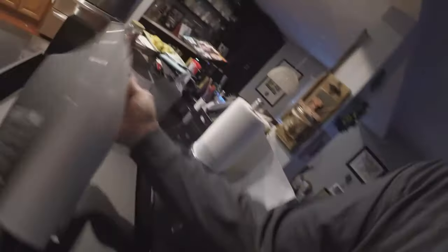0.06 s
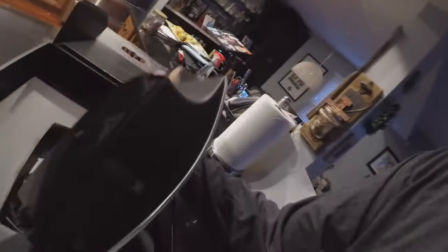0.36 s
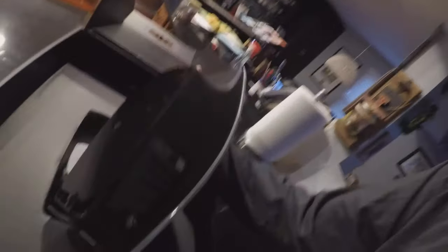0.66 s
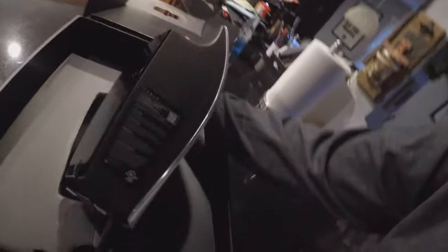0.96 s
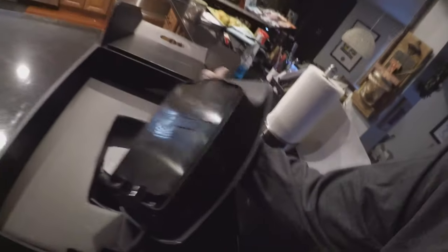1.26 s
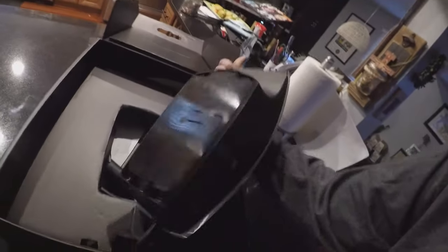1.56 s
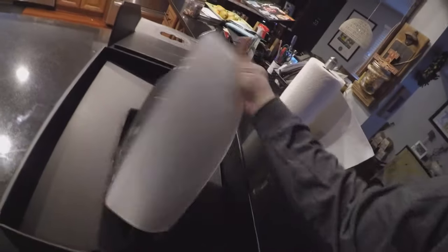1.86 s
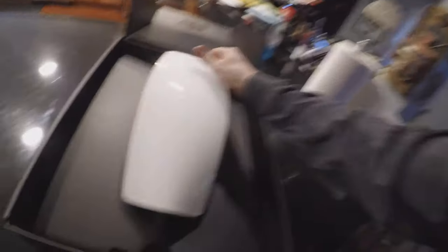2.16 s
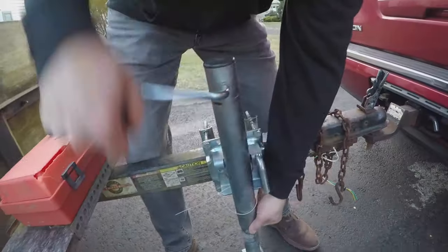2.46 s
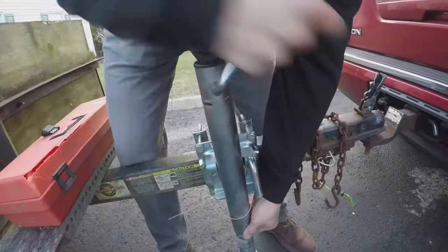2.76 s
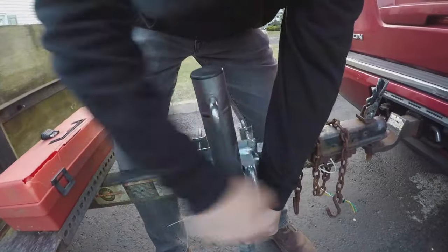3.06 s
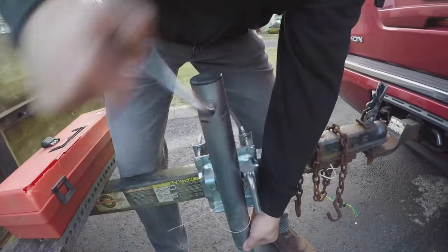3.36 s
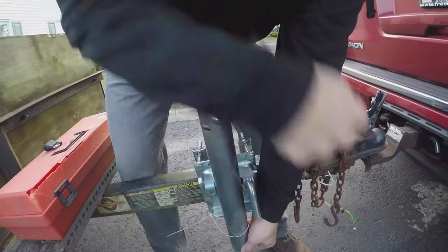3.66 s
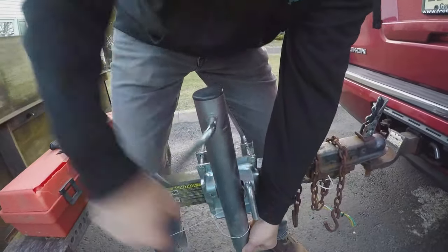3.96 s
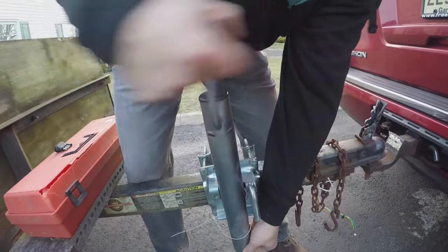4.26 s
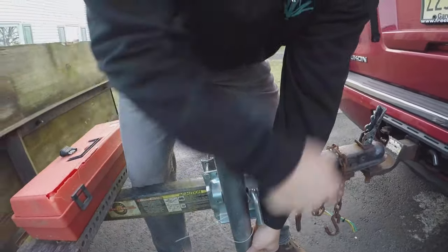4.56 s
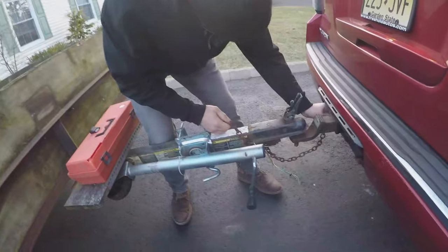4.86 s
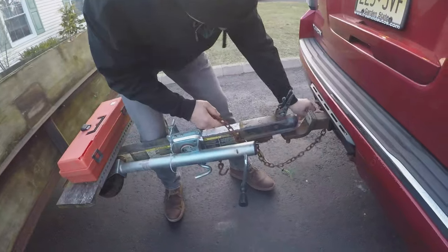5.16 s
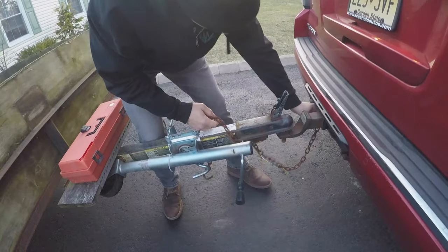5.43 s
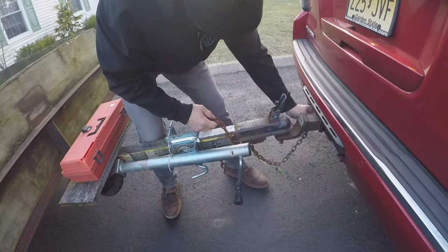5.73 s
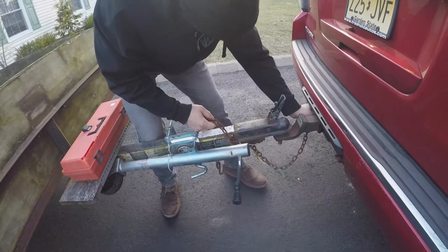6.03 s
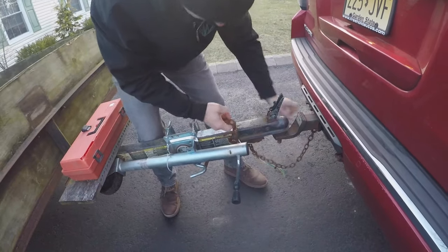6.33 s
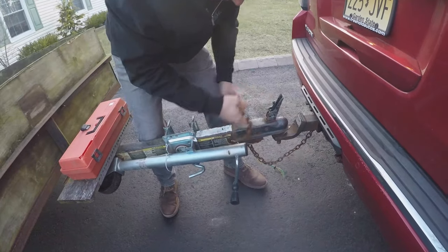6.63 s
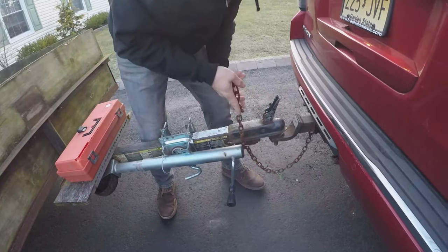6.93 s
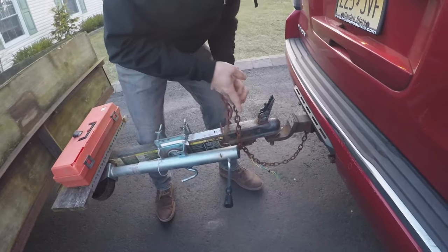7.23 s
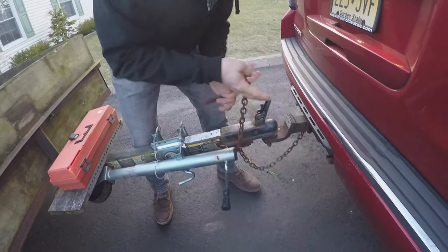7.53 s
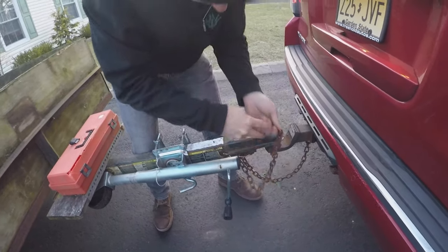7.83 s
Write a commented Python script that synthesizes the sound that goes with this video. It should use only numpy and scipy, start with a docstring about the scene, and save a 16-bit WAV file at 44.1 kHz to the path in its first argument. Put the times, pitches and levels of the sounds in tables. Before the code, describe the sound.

Close, hollow plastic bumps and slides against a tray in a still room. Suddenly the setting is a driveway with a low idling engine, and a hand-cranked trailer jack gives uneven metal clanks over ticking gears and a groaning screw. That switches to the sharp rattle of a hitch coupler, followed by the clacks of a hook and small, bell-like clinks of chain links.

```python
"""Plastic shell, trailer jack and hitch

In a quiet kitchen a hollow plastic shell knocks and scrapes in its packing tray. Then, outdoors by an
idling van, a trailer jack is cranked: its gears tick, its screw grinds, its loose tubes clank. Last the
coupler rattles on the hitch ball, the safety chain's hook clacks and one link rings. Impacts excite
damped modes of vibration; stick-slip friction makes the scrapes and squeaks."""
import sys
import numpy as np
from scipy import signal
from scipy.fft import rfft, irfft
from scipy.io import wavfile

SR = 44100
rng = np.random.default_rng(int(sys.argv[2]) if len(sys.argv) > 2 else 0)


def bounce(signal):
    """Save signal as a 16-bit WAV file at the path given by the first command-line argument."""
    frames = np.transpose(np.atleast_2d(signal))
    limited = np.clip(frames, -1, 1)
    pcm = np.round(limited * 32767).astype(np.int16)
    wavfile.write(sys.argv[1], SR, pcm)


N = 352359
TIME, BINS = np.arange(N) / SR, np.fft.rfftfreq(N, 1 / SR)
OUTDOORS_AT_S, HITCH_AT_S = 2.461, 4.735
PIVOT_HZ, CUTOFF_HZ = 2000, 15600  # centre of a blow's spectral tilt; upper band limit

# Spectra of room air, outdoor wash and slow air pressure: (frequency [Hz], relative density [dB])
KITCHEN_SPECTRUM = [(35, -29), (60, 9), (246, -12), (289, -5), (1210, -12), (3340, -17), (4110, -19.5),
                    (9020, -24), (14000, -32), (15000, -31)]
STREET_SPECTRUM = [(15, -38), (25, 2.5), (88, -11.5), (115, -11), (191, -17.5), (344, -18.5), (415, -22.5),
                   (790, -23.5), (1090, -28), (1670, -27), (4150, -37.5), (4500, -39), (7480, -45),
                   (8100, -46.5), (15000, -59)]
SWAY_SPECTRUM = [(.5, -20), (2, 0), (5, -3), (10, -16), (20, -31), (40, -49), (80, -70), (300, -110)]
KITCHEN_DB, STREET_DB = -49, -35
# Envelopes of the outdoor wash and the slow air pressure: (time [s], level [dB])
STREET_ENVELOPE = [(2.46, 3.5), (4.7, 7), (4.8, 6), (5.6, 6), (6.4, 5), (6.8, 2.5), (7.4, 5.5), (8, 5.5)]
SWAY_ENVELOPE = [(0, -11.5), (.9, -13), (1.3, -16), (1.7, -12), (2.4, -14), (2.6, -18.5), (8, -20)]
# Idling speed: (time [s], second harmonic of the firing rate [Hz])
IDLE_SPEED = [(2.5, 100.3), (3.1, 100.3), (3.2, 99), (4.65, 98.9), (4.8, 97.5), (5.3, 96.6), (5.6, 99),
              (8, 98.9)]
# Exhaust harmonics: (order [multiple of the cycle rate], level [dB])
ENGINE_ORDERS = [(3, -33), (4, -46), (5, -34), (7, -38), (8, -27), (9, -40), (10, -42), (11, -27),
                 (12, -39), (13, -29), (14, -39), (16, -29), (21, -44), (22, -42), (23, -46), (24, -41)]

# Impacts: (time [s], level [dB], brightness [dB/octave], t60 at 3 kHz [s])
SHELL_IMPACTS = [(.177, -30.5, 1.3, 0.037), (.24, -28, 3, 0.17), (.261, -18, 0.8, 0.065),
                 (.426, -36, 3, 0.044), (.497, -42, 5, 0.11), (.993, -34, 3, 0.023),
                 (1.55, -31.5, 3, 0.035), (1.654, -23, -0.8, 0.04), (1.681, -24.5, 1, 0.056),
                 (1.723, -29, -1, .068), (1.734, -23.5, 7.5, 0.049), (1.749, -14.5, -0.5, 0.038),
                 (1.897, -24.5, 0, 0.12), (1.91, -21, 0, 0.025), (1.946, -23.5, 0.4, 0.25),
                 (2.016, -25.5, 0, 0.42), (2.139, -23.5, -0.8, 0.28), (2.172, -27, -2.5, 0.27),
                 (2.211, -22, -4, 0.075), (2.222, -29.5, 6.5, 0.42), (2.254, -22, -2.3, 0.09),
                 (2.277, -22.5, -1.3, 0.067)]
HOOK_IMPACTS = [(6.273, -32, -2.5, 0.098), (6.2905, -25.5, 5.5, 0.17), (6.314, -15, -0.5, .12),
                (6.357, -39.5, 10, 0.14), (6.425, -36.5, -4, 0.068), (6.475, -29.5, -2, 0.26),
                (6.538, -24, 3.4, 0.079), (6.603, -20, 0.9, 0.14), (6.643, -16.5, 0, 0.15),
                (6.672, -24.5, -1.8, 0.13), (6.7, -25, -4, 0.082), (6.921, -34.5, -1.5, .06),
                (6.944, -29.5, -2.8, 0.19), (7.326, -24, -1.5, 0.21), (7.5035, -17.5, 0.5, 0.1),
                (7.591, -49, 9, 0.03), (7.727, -23, 0, 0.11), (7.765, -34.5, 0.5, 0.39),
                (7.815, -32.5, -1.3, 0.093), (7.849, -46.5, 7, .06), (7.93, -35, 8, 0.065),
                (7.942, -20.5, 0, 0.15)]
# Rebounding impacts: (time [s], level [dB], brightness [dB/octave], t60 at 3 kHz [s], rebound [dB])
JACK_IMPACTS = [(2.598, -16, -0.3, 0.071, -3), (2.7455, -11, 0.3, 0.07, -12),
                (3.065, -22, -1.5, 0.15, -2.5), (3.146, -16.5, -0.5, 0.11, -12),
                (3.158, -16.5, -0.5, 0.062, -11), (3.251, -16, -0.5, 0.069, -1),
                (3.4125, -16.5, 0, 0.08, -20), (3.5655, -14.5, -0.6, 0.11, -23),
                (3.635, -15, 0.3, 0.096, -2), (3.712, -23.5, -1.5, .05, -12), (3.743, -22, -2, 0.083, -17),
                (3.941, -24.5, -1.5, 0.056, -27), (4.046, -21, -1, 0.093, -22), (4.112, -14.5, 0, 0.09, -2),
                (4.229, -24.5, -2.5, 0.073, -4), (4.579, -26.5, -4, 0.091, -12),
                (4.591, -14, 0.9, 0.076, -23), (4.62, -19.5, -2, 0.057, -3.5),
                (4.684, -15.5, -0.5, 0.11, -15)]
COUPLER_IMPACTS = [(4.89, -17.5, -0.16, 0.069, -3.5), (4.9775, -14, -0.97, 0.058, -1.5),
                   (5.183, -25, -0.16, 0.22, -5), (5.284, -20, 1.8, 0.24, -2),
                   (5.341, -17.5, -1.7, 0.058, -3.5), (5.391, -22.5, 1.8, 0.13, -0.5),
                   (5.71, -30.5, -1.3, 0.12, -19), (5.788, -29.5, -1.2, .19, -14),
                   (5.818, -27, -2.7, 0.099, -15), (5.953, -30.5, 2.4, 0.18, -7),
                   (5.9755, -12, 1, 0.13, -11), (6.142, -11, 1.3, 0.083, -5)]
# Main modes of each body: (frequency [Hz], relative level [dB], t60 [s])
SHELL_RESONANCES = [(294, -13, 0.15), (384, -27, 0.02), (524, 29.5, 0.015), (915, -46, 0.098),
                    (1760, 26.5, 0.018), (2210, -15, 0.027)]
JACK_RESONANCES = [(259, 1, 0.1), (296, 5, 0.12), (414, 4, 0.36), (528.5, 4.5, 0.17), (788, 1.5, 0.18),
                   (1591, 1.5, 0.035), (2300, -15, 0.045), (2750, -25, 0.054), (3140, -4, 0.041),
                   (3620, -22, 0.045), (4430, -14.5, 0.055)]
COUPLER_RESONANCES = [(1035, -8, .22), (1111, -10, .2), (1322, -7, .24), (1620, 1, .22), (1770, -4, .12),
                      (1836, 0, .19), (1930, -5, .13), (2160, -5, .16), (2440, -4, .15), (2810, -6, .14),
                      (3890, -8, .1), (5090, -10, .1), (6190, -10, .12), (6820, -11, .1), (7930, -13, .13)]
HOOK_RESONANCES = [(1236, -18.5, 0.25), (1940, 0, 0.081), (2200, 10.5, 0.067), (2800, -43, .08),
                   (3210, 6, 0.041), (3420, -11, 0.031), (3950, -1, .07), (4260, 8, 0.058),
                   (5600, -10, 0.063), (6250, -22, .08), (7770, -17, 0.12)]
# Spectral envelope of each body's dense, short modes: (frequency [Hz], relative density [dB])
SHELL_SPECTRUM = [(59, -18), (100, -20), (236, -4), (274, 0), (383, -1), (582, -7.5), (1290, -12.5),
                  (1400, -13), (2230, -16.5), (2800, -21.5), (5260, -28), (9260, -30), (15000, -47)]
JACK_SPECTRUM = [(100, -23), (170, 2), (272, 12.5), (468, 0), (523, 1.5), (1030, -10), (1170, -16.5),
                 (1410, -11.5), (2720, -17.5), (4520, -28), (6830, -25.5), (12700, -41), (15000, -61)]
SCREW_SPECTRUM = [(100, -37), (170, -4), (277, 20), (643, -16.5), (821, -6), (1070, -13), (1390, -18),
                  (1610, -8), (1800, -20.5), (3410, -31.5), (4040, -57), (4520, -30), (5990, -31),
                  (6580, -31), (15000, -46.5)]
COUPLER_SPECTRUM = [(120, -57), (200, -4), (613, -11), (1330, -1.5), (1490, -2), (1810, 8), (2060, 0),
                    (2460, -2.5), (7020, -12.5), (8410, -24), (15000, -44)]
HOOK_SPECTRUM = [(120, -41), (200, -30), (696, -25), (1240, -14.5), (1380, -13), (1850, 13), (2380, -2.5),
                 (3120, 1), (5660, -10.5), (6080, -6), (15000, -31.5)]
GEAR_CASE_SPECTRUM = [(600, -6), (1500, 8.5), (3300, 1), (5500, -4.5), (7200, -6.5), (9500, -18.5),
                      (15000, -26)]
# Thud, clang, ping and edge bands of an impact: (lower limit [Hz], upper limit [Hz])
IMPACT_BANDS = [(150, 1000), (1000, 2600), (2600, 5500), (5500, 15500)]
# Each body's balance over those bands: (thud [dB], clang [dB], ping [dB], edge [dB])
SHELL_BANDS_DB = (1, -7.5, -14.5, -20.5)
JACK_BANDS_DB = (-0.5, 1, -2.5, -11.5)
COUPLER_BANDS_DB = (-8, -1, -6, -12.5)
HOOK_BANDS_DB = (-4, -0.5, 2, -4.5)

# Soft bumps of the shell on the tray: (time [s], level [dB], frequency [Hz])
SHELL_BUMPS = [(.122, -25.5, 95), (0.269, -22, 139), (0.324, -26, 90), (.575, -50, 85), (0.761, -18, 85),
               (1.762, -27, 122)]
# Pushes of the shell across the tray: (time [s], duration [s], level [dB])
SHELL_PUSHES = [(.01, 0.21, -35), (.25, 0.065, -27), (0.431, 0.065, -39.5), (0.638, 0.13, -36),
                (0.995, 0.056, -35), (1.645, 0.11, -23.5), (1.804, 0.095, -25.5), (1.967, 0.11, -25.5),
                (2.091, 0.16, -20.5)]
PUSH_ATTACK_S, PUSH_SWELL_DB, PUSH_FADE_DB_PER_S = 0.042, 7, 263
# Squeaks of plastic, then of steel: (time [s], duration [s], frequency [Hz], level [dB])
FRICTION_SQUEAKS = [(0.775, .05, 6270, -46), (1.04, 0.09, 6250, -45), (1.81, 0.024, 884, -24),
                    (1.974, 0.014, 950, -22), (2, 0.07, 995, -20), (2.134, 0.019, 2195, -13.5),
                    (4.64, 0.011, 1400, -7), (5.295, 0.031, 3750, -11)]
# Single steel modes struck squarely: (time [s], frequency [Hz], level [dB], t60 [s])
PING_STRIKES = [(2.5991, 3200, -3.5, 0.022), (3.065, 3100, -10, 0.028), (3.567, 2750, -2.5, 0.028),
                (3.5654, 4050, -7.5, 0.034), (4.046, 3450, -9.5, 0.023), (4.047, 4150, -15, .025),
                (5.286, 2800, -16, 0.085), (5.392, 2810, -16.5, 0.088), (6.142, 13550, -46, .5),
                (6.315, 4198, -19, 0.19), (6.32, 6024, -17.5, 0.22), (6.356, 6024, -12, 0.089),
                (6.476, 2193, -13, 0.14), (6.603, 2195, -9.5, 0.11), (6.604, 3100, -6.5, 0.053),
                (7.504, 3400, -7, 0.03), (7.727, 3200, -7, 0.03)]
# Modes of the free link: (frequency [Hz], relative level [dB], decay time [multiple of the tap's t60])
LINK_RESONANCES = [(4366, 0, 1), (6304, -3, .8), (8091, -11.5, 1.5), (10546, -15, 1.1), (13792, -24, 1.5)]
# Taps on that link: (time [s], level [dB], brightness [dB/octave], t60 of the lowest mode [s])
LINK_TAPS = [(4.89, -24.5, 6, 0.069), (5.039, -36, 7, .12), (5.135, -37, 6, 0.12),
             (6.703, -17.5, 0.5, 0.41), (6.85, -22, -2, 0.1), (6.997, -24.5, -4, 0.23),
             (7.012, -18, 0.5, 0.2), (7.179, -23, -1, 0.28), (7.27, -32.5, 3.5, 0.45),
             (7.326, -11.5, 4, 0.12), (7.438, -38, 3, 0.33), (7.583, -26, -8, 0.12),
             (7.595, -29, 15, 0.036)]
# Friction of the jack's loaded screw: (time [s], tube groan [dB], thread rasp [dB])
SCREW_LEVELS = [(2.47, -34, -42), (2.66, -27.5, -32), (2.85, -29.5, -31.5), (3.28, -28.5, -32),
                (3.6, -31.5, -38), (3.9, -33, -44.5), (4.2, -17.5, -30.5), (4.45, -31, -33.5),
                (4.73, -18, -47)]
# Start of each turn of the crank: (time [s])
TURN_STARTS = [2.3827, 2.859, 3.3975, 3.8555, 4.3989, 4.891]
TEETH_PER_TURN, HURRY_TEETH, HURRY_AT_TURN = 14, .066, .604  # the arm hurries on one side of the circle
TICK_ABOVE_RASP_DB, TICK_SCATTER_DB = 11.5, 1.5


def amp(db):
    """Amplitude ratio of a level in decibels."""
    return 10 ** (np.asarray(db) / 20)


def rms(x):
    """Root-mean-square amplitude."""
    return np.sqrt(np.mean(x ** 2) + 1e-20)


def decay(t, t60):
    """Exponential damping: the level falls 60 dB in t60 seconds."""
    return np.exp(-np.log(1000) * t / t60)


def curve(rows, column=1):
    """Linear interpolation of one table column over time."""
    rows = np.array(rows)
    return np.interp(TIME, rows[:, 0], rows[:, column])


def add(mix, start_s, sound):
    """Superposition: a sound joins the mix at its start time."""
    part = mix[max(round(start_s * SR), 0):][:len(sound)]
    part += sound[:len(part)]


def band(x, lo_hz, hi_hz, order=4):
    """Causal band-pass filtering."""
    sections = signal.butter(order, [lo_hz, min(hi_hz, SR / 2 - 1)], "band", fs=SR, output="sos")
    return signal.sosfilt(sections, x)


def coloured(x, spectrum):
    """Spectral shaping of an excitation, scaled to unit rms."""
    hz, db = np.transpose(spectrum)
    y = irfft(rfft(x) * amp(np.interp(np.log(BINS + 1), np.log(hz + 1), db)), N)
    return y / rms(y)


def drift(rate_hz):
    """Random fluctuation: low-pass noise of unit rms."""
    y = irfft(rfft(rng.standard_normal(N)) / (1 + (BINS / rate_hz) ** 4), N)
    return y / rms(y)


def slips(per_s, spread_db):
    """Friction as a random impulse train: many tiny slips, a few large ones."""
    size = amp(spread_db * np.minimum(rng.exponential(1, N), 4))
    return size * rng.choice([-1, 1], N) * (rng.random(N) < per_s / SR)


def dense_modes(spectrum, spacing_hz, ripple_db):
    """Modal overlap: many modes merge into half a second of noise with random spectral peaks."""
    size = SR // 2
    hz = np.fft.rfftfreq(size, 1 / SR)
    points_hz, points_db = np.transpose(spectrum)
    knots = np.arange(0, SR / 2, spacing_hz)
    db = np.interp(np.log(hz + 1), np.log(points_hz + 1), points_db)
    db += ripple_db * np.interp(hz, knots, rng.uniform(-1.02, 1, len(knots)))
    return irfft(amp(db) * np.exp(2j * np.pi * rng.random(len(hz))), size)


def impacts(rows, bands_db, modes, spectrum, ring_db, chatter_s, bass_exponent, tail_db, tail_t60):
    """Free vibration after impact: dense modes chatter and decay; main modes and a faint tail ring on."""
    out, t = np.zeros(N), np.arange(SR // 2) / SR
    mode_hz, mode_db, mode_t60 = np.transpose(modes)[:, :, None]
    attack = t < .015
    for start, db, bright_db, t60 in rows:
        shake = dense_modes(spectrum, spacing_hz=90, ripple_db=7)
        shake *= (1 - np.exp(-t / 0.0001)) / rms(shake)
        spot_db = 3 * rng.standard_normal(mode_hz.shape)  # each contact point weights the modes anew
        tones = np.sin(2 * np.pi * (mode_hz * t + rng.random(mode_hz.shape)))
        ring = (amp(mode_db + spot_db) * decay(t, mode_t60) * tones).sum(0)
        ring *= 1 - np.exp(-t / 0.0084)
        for (lo_hz, hi_hz), share_db in zip(IMPACT_BANDS, bands_db):
            centre_hz = np.sqrt(lo_hz * hi_hz)
            stretch = (3000 / centre_hz) ** bass_exponent  # low modes last longer
            envelope = decay(np.maximum(t - chatter_s, 0), t60 * stretch)
            envelope += amp(tail_db) * decay(t, tail_t60 * stretch)
            part = band(shake * envelope + amp(ring_db) * ring, lo_hz, hi_hz)
            tilt_db = bright_db * np.log2(centre_hz / PIVOT_HZ)  # harder contact is brighter
            add(out, start, amp(db + share_db + tilt_db) * part / rms(part[attack]))
    return out


def with_rebounds(rows, delay_s, duller_db_per_octave):
    """Backlash: a part with play hits one stop, then falls back on the other with a duller blow."""
    hits = []
    for start, db, bright_db, t60, rebound_db in rows:
        hits.append((start, db, bright_db, t60))
        hits.append((start + delay_s, db + rebound_db, bright_db - duller_db_per_octave, t60))
    return hits


def kitchen():
    """Ambient noise of still room air, wavering slightly in level."""
    air = coloured(rng.standard_normal(N), KITCHEN_SPECTRUM)
    return amp(KITCHEN_DB + .8 * drift(3.7)) * air / rms(band(air, 140, 15000))


def driveway():
    """Ambient noise outdoors: a broadband wash that swells a little."""
    wash = coloured(rng.standard_normal(N), STREET_SPECTRUM)
    level_db = STREET_DB + curve(STREET_ENVELOPE) + 0.15 * drift(14.0)
    return wash * amp(level_db) / rms(band(wash, 89, 15000))


def air_sway():
    """Infrasound: slow pushes of air vary the pressure, mostly below the range of hearing."""
    return amp(curve(SWAY_ENVELOPE)) * coloured(rng.standard_normal(N), SWAY_SPECTRUM)


def engine():
    """Periodic excitation: eight cylinders fire unevenly, so the exhaust sounds orders of the cycle."""
    cycles = np.cumsum(curve(IDLE_SPEED) / 16) / SR  # the second firing harmonic is order 16
    out = np.zeros(N)
    for order, db in ENGINE_ORDERS:
        out += amp(db) * np.sqrt(2) * np.sin(2 * np.pi * (order * cycles + rng.random()))
    return out * amp(0.55 * drift(3))


def squeaks():
    """Stick-slip oscillation: a surface sounds a wandering pitch with a weak octave."""
    out, wander = np.zeros(N), drift(400)
    for start, length, hz, db in FRICTION_SQUEAKS:
        pitch = hz * (1 + 0.025 * wander[round(start * SR):][:round(length * SR)])
        phase = 2 * np.pi * np.cumsum(pitch) / SR
        tone = np.sin(phase) + amp(-37) * np.sin(2 * phase)
        add(out, start, amp(db - 1) * np.hanning(len(phase)) * tone)
    return out


def sliding():
    """Sliding friction: plastic judders on the tray, swells as the hand bears down, then fades."""
    pressure = np.zeros(N)
    for start, length, db in SHELL_PUSHES:
        t = np.arange(0, length + .5, 1 / SR)
        swell_db = PUSH_SWELL_DB * np.minimum(t / length - 1, 0)
        fade_db = PUSH_FADE_DB_PER_S * np.maximum(t - length, 0)
        add(pressure, start, np.minimum(t / PUSH_ATTACK_S, 1) * amp(db + swell_db - fade_db))
    return pressure * coloured(slips(per_s=700, spread_db=3.5), SHELL_SPECTRUM)


def shell():
    """Contact excites the hollow shell: knocks and slides ring many modes, soft bumps one low tone."""
    out = impacts(SHELL_IMPACTS, SHELL_BANDS_DB, SHELL_RESONANCES, SHELL_SPECTRUM,
                  ring_db=-16, chatter_s=0.0011, bass_exponent=0.02, tail_db=-11, tail_t60=0.35)
    t = np.arange(SR // 4) / SR
    rise = t / 0.0044
    for start, db, hz in SHELL_BUMPS:
        add(out, start, amp(db) * np.sin(2 * np.pi * hz * t) * rise * np.exp(1 - rise))
    return out + amp(-3.5) * sliding()


def pings():
    """Selective excitation: a square blow on steel sounds one damped mode far above the rest."""
    out, t = np.zeros(N), np.arange(SR // 3) / SR
    for start, hz, db, t60 in PING_STRIKES:
        add(out, start, amp(db) * np.sin(2 * np.pi * hz * t) * decay(t, t60))
    return out


def link():
    """Inharmonic modes: a free link clicks and rings like a small bell when a neighbour taps it."""
    out, t = np.zeros(N), np.arange(SR // 2) / SR
    hz, mode_db, t60_factor = np.transpose(LINK_RESONANCES)[:, :, None]
    # the swinging link brushes its neighbours, so each mode wavers in level and a little in pitch
    waver = np.array([drift(22) for _ in LINK_RESONANCES])
    for start, db, bright_db, t60 in LINK_TAPS:
        swing = np.take(waver, round(start * SR) + np.arange(len(t)), axis=1, mode="clip")
        swing = swing - swing[:, :1]
        waver_db, waver_cycles = 3 * np.tanh(swing), .2 * swing
        gain = amp(db + mode_db + waver_db + bright_db * np.log2(hz / hz[0]))
        tones = np.sin(2 * np.pi * (hz * t + waver_cycles + rng.random(hz.shape)))
        ring = (gain * tones * decay(t, t60 * t60_factor)).sum(0)
        click = band(rng.standard_normal(len(t)), 2000, 8700, order=2) * np.exp(-t / 0.01)
        add(out, start, ring + amp(db - 1 + .5 * bright_db) * click)
    return out


def hitch():
    """Steel-on-steel impact: the coupler rattles on the ball; chain and hook clack on the tongue."""
    hits = with_rebounds(COUPLER_IMPACTS, delay_s=.014, duller_db_per_octave=1.0)
    coupler = impacts(hits, COUPLER_BANDS_DB, COUPLER_RESONANCES, COUPLER_SPECTRUM,
                      ring_db=-6.5, chatter_s=0.0087, bass_exponent=0.24, tail_db=-32, tail_t60=0.2)
    hook = impacts(HOOK_IMPACTS, HOOK_BANDS_DB, HOOK_RESONANCES, HOOK_SPECTRUM,
                   ring_db=-5, chatter_s=0.002, bass_exponent=0.33, tail_db=-42, tail_t60=0.16)
    return amp(-1.74) * coupler + hook


def gears():
    """Gear meshing: each bevel tooth scuffs as it engages, exciting the modes of the gear case."""
    out, t = np.zeros(N), np.arange(SR // 2) / SR
    turns = np.interp(TIME, TURN_STARTS, np.arange(len(TURN_STARTS)))
    teeth = TEETH_PER_TURN * turns - HURRY_TEETH * np.sin(2 * np.pi * (turns - HURRY_AT_TURN))
    rasp_db = curve(SCREW_LEVELS, column=2)  # the load on the thread also drives the teeth
    envelope = (1 - np.exp(-t / 0.00086)) * np.exp(-t / 0.0063)
    for sample in np.flatnonzero(np.diff(np.floor(teeth)) > 0):
        db = rasp_db[sample] + TICK_ABOVE_RASP_DB + TICK_SCATTER_DB * rng.standard_normal()
        scuff = dense_modes(GEAR_CASE_SPECTRUM, spacing_hz=200, ripple_db=5)
        add(out, sample / SR, amp(db) * scuff / rms(scuff) * envelope)
    return out


def screw():
    """Friction drives resonance: the thread rasps in its nut and the tube groans below it."""
    groan_db, rasp_db = curve(SCREW_LEVELS, column=1), curve(SCREW_LEVELS, column=2)
    friction = coloured(slips(per_s=4000, spread_db=1.5), SCREW_SPECTRUM)
    groan, rasp = band(friction, 203, 626), band(friction, 600, 11700)
    load = amp(1.06 * drift(60))
    return load * (amp(groan_db - 0.5) * groan / rms(groan) + amp(rasp_db) * rasp / rms(rasp))


def jack():
    """Backlash: cranking takes up the play in the tubes with clanks, over the gears and the screw."""
    hits = with_rebounds(JACK_IMPACTS, delay_s=.02, duller_db_per_octave=0.7)
    clanks = impacts(hits, JACK_BANDS_DB, JACK_RESONANCES, JACK_SPECTRUM,
                     ring_db=-12, chatter_s=0.00079, bass_exponent=0.61, tail_db=-34, tail_t60=0.11)
    return amp(-3) * clanks + gears() + screw()


def scene():
    """Superposition of the sources; kitchen, jack and hitch follow one another abruptly."""
    indoors = shell() + kitchen()
    outdoors = engine() + driveway() + np.where(TIME < HITCH_AT_S, jack(), hitch() + link())
    return (np.where(TIME < OUTDOORS_AT_S, indoors, outdoors) + squeaks() + pings() + air_sway())[None]


def record(dry):
    """Soft saturation rounds the loudest peaks; a low-pass filter limits the bandwidth."""
    rounded = dry / (1 + np.abs(dry) ** 6) ** (1 / 6)
    low_pass = signal.firwin(255, CUTOFF_HZ, window=("kaiser", 8), fs=SR)
    return signal.oaconvolve(rounded, low_pass[None], "same")


dry = scene()
out = record(dry)
bounce(out)
```